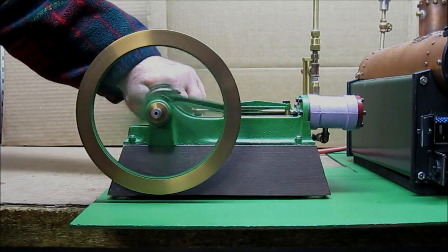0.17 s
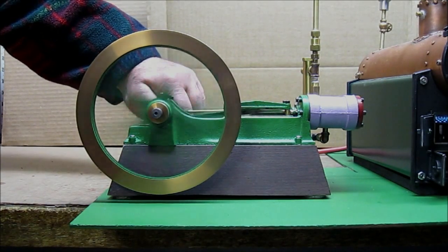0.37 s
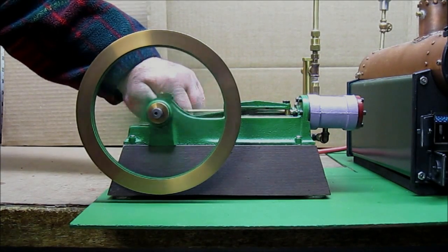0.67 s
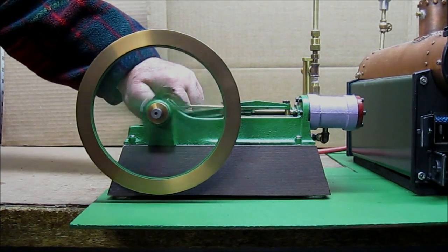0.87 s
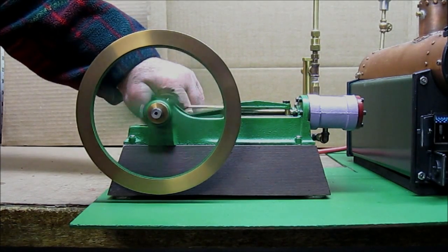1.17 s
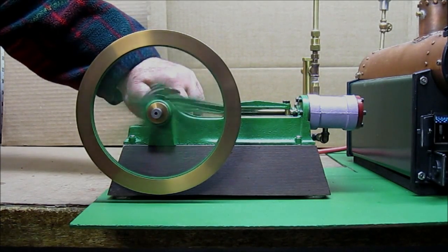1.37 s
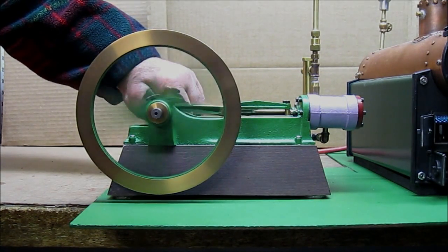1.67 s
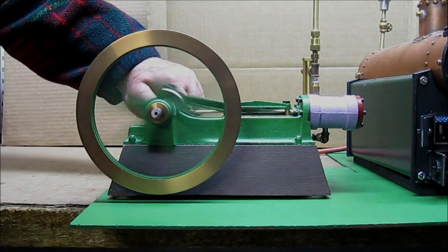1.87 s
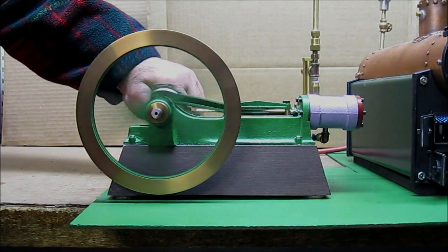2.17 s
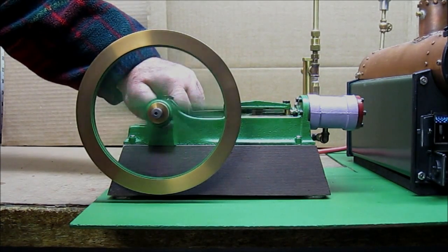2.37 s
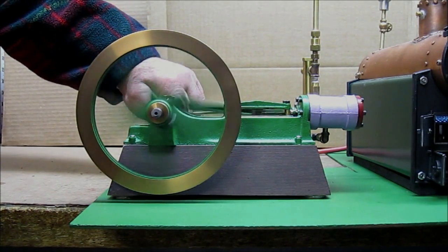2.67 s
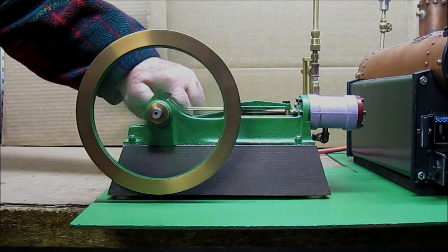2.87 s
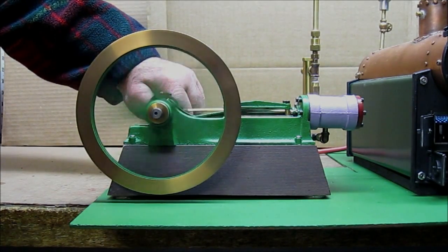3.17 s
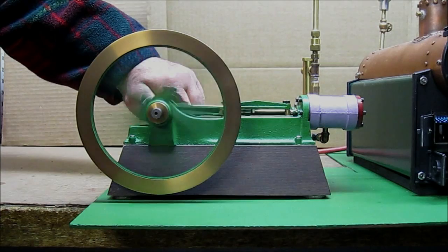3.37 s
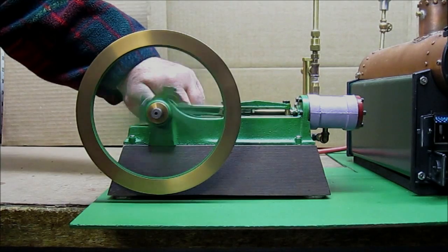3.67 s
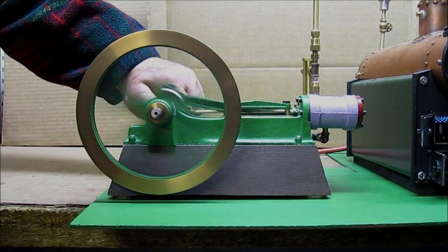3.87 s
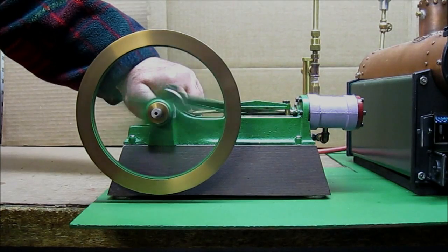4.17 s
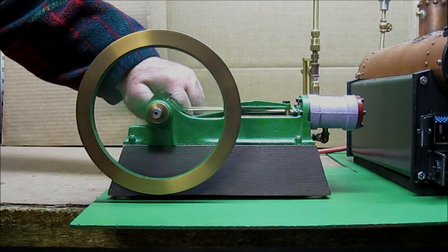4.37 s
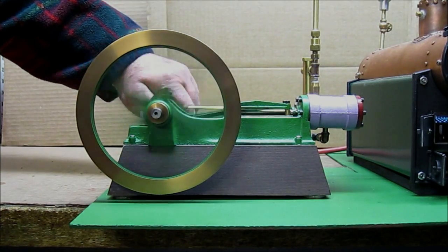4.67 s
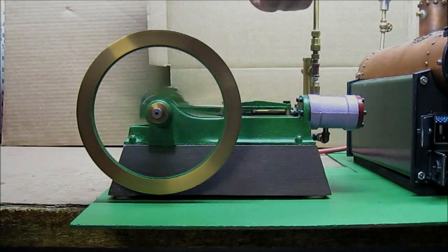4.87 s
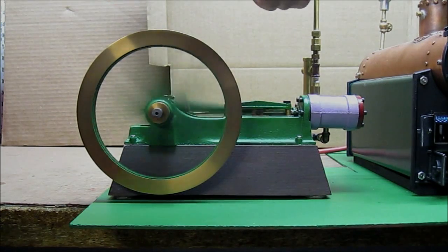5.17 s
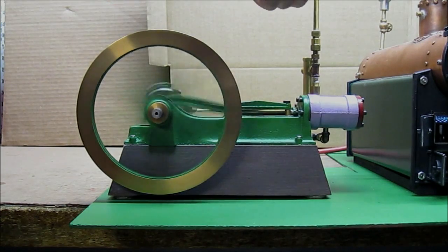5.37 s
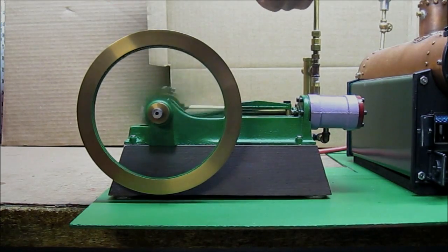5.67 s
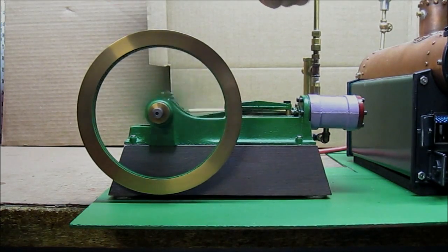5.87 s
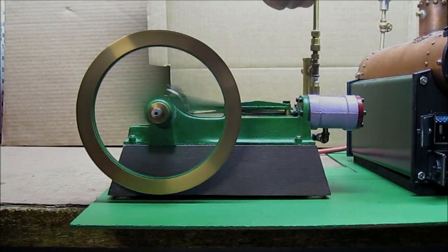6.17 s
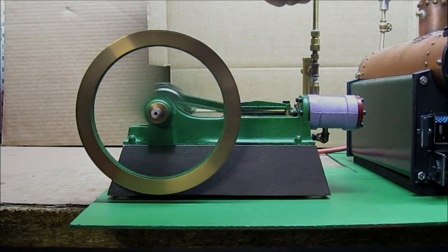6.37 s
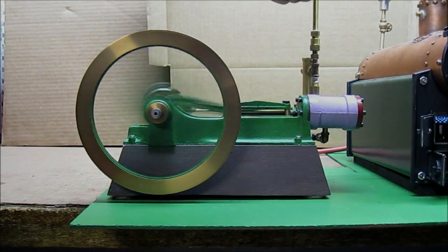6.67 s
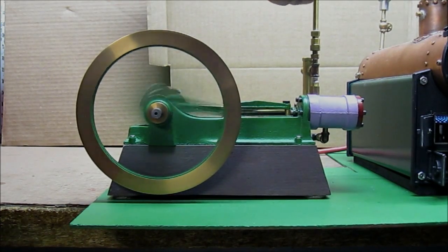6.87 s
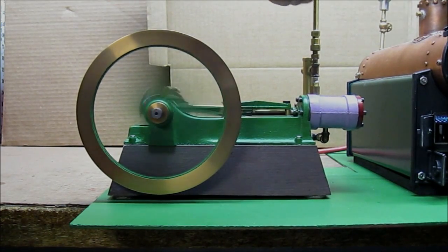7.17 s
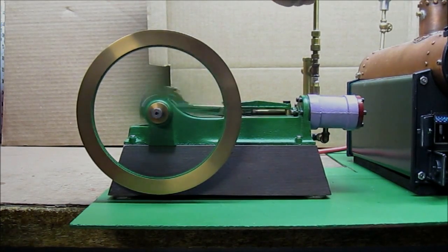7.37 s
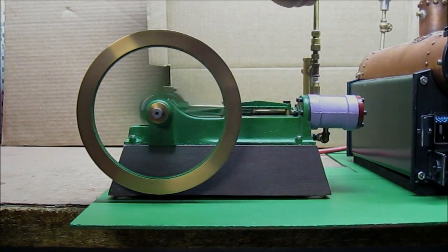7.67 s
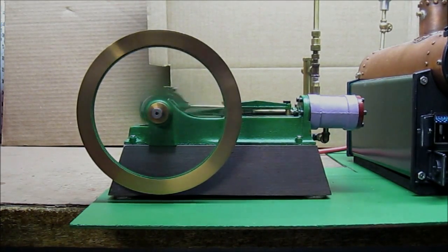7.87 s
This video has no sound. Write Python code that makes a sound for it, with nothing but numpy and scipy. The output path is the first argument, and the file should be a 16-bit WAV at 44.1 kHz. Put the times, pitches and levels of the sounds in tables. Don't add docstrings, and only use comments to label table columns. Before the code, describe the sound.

Fast hard metallic clacking of a toy steam engine, held back by hand for five seconds, then speeding up with sputtering steam and ringing metal.

```python
import sys
import numpy as np
from scipy import signal
from scipy.fft import rfft, irfft, next_fast_len
from scipy.io import wavfile
from scipy.ndimage import map_coordinates

SR = 44100
rng = np.random.default_rng(int(sys.argv[2]) if len(sys.argv) > 2 else 0)


def attenuation_scalar(level_db):
    decades = np.asarray(level_db, float) / 20
    return 10 ** decades


def persist_wave(psi):
    counts = np.round(np.clip(psi, -1, 1) * 32767).astype(np.int16)
    wavfile.write(sys.argv[1], SR, np.atleast_2d(counts).T)


N = 353241
RELEASED, FULL_SPEED = 4.92, 6.06

# time in seconds, speed in turns a second.
BRAKED_SPEED = [
    (-.1, 6.283),
    (0, 6.283),
    (.3, 6.948),
    (1.15, 6.393),
    (2.25, 6.366),
    (2.9, 6.446),
    (4.05, 6.753),
    (4.65, 6.861),
    (4.92, 7.585),
]
# time in seconds, speed in turns a second.
FREE_SPEED = [
    (4.92, 8.03),
    (5.62, 8.836),
    (6.57, 9.626),
    (8.02, 9.986),
]
PACES = 6.9, 7.6, 8.3, 9.3, 9.75
# frequency in Hz, level in dB per Hz.
RATTLE = [(180, -34), (300, -17), (900, -4.5), (1190, 1.5), (1700, -5), (2140, -3.5), (3400, -18),
          (16000, -64)]


def along(points, hz):
    f, db = np.transpose(points)
    return np.interp(np.log(hz + 1), np.log(f + 1), db)


def filtered(x, response):
    size = next_fast_len(len(x) + SR // 2)
    spectrum = rfft(x, size) * response(np.fft.rfftfreq(size, 1 / SR))
    return irfft(spectrum, size)[:len(x)]


def noise(spectrum, size=N):
    x = filtered(rng.standard_normal(size), lambda hz: attenuation_scalar(along(spectrum, hz)))
    return x / np.std(x)


def resonant(modes, order=1, sign=-1):
    def response(f):
        total = 0
        for k, (centre, width, db) in enumerate(modes):
            damping = 1j * f * width
            total = total + sign ** k * attenuation_scalar(db) * (damping / (centre * centre - f * f + damping)) ** order
        return total
    return response


def train(s, db):
    at = np.round(np.asarray(s) * SR).astype(int)
    inside = (at >= 0) * (at < N)
    return np.bincount(np.clip(at, 0, N - 1), attenuation_scalar(db) * inside, N)


def swell(pulses, rise, t60):
    t = np.arange(SR // 4) / SR
    return signal.fftconvolve(pulses, (1 - np.exp(-t / rise)) * attenuation_scalar(-60 * t / t60))[:N]


def wander(size, rate):
    return map_coordinates(rng.standard_normal(size), [np.arange(N) * rate / SR])


def paced(s, values):
    speed = np.interp(s, *np.transpose(BRAKED_SPEED + FREE_SPEED))
    return np.interp(speed, PACES, values)


def knocks(angle, delay_ms, scatter_db, *db):
    start_turns = -.953, 32.8842
    slack = 1, 1, 2, 1.6, 1.4
    luck = rng.standard_normal(70)
    rows = []
    for run, start in zip((BRAKED_SPEED, FREE_SPEED), start_turns):
        t = np.arange(run[0][0], run[-1][0], 1 / SR)
        turns = start + np.cumsum(np.interp(t, *np.transpose(run))) / SR
        turn = np.arange(np.ceil(turns[0] - angle), turns[-1] - angle)
        rows.append([np.interp(turn + angle, turns, t) + delay_ms / 1000, turn])
    s, turn = np.hstack(rows)
    scatter = scatter_db * paced(s, slack) * luck[turn.astype(int)]
    return s, paced(s, db) + scatter, turn


def burner():
    # frequency in Hz, level in dB per Hz.
    flame = [(70, -34), (229, -5.5), (650, 5.5), (850, -10.5), (2100, -12.5), (3000, -13), (6020, -19),
             (16000, -40.5)]
    flame_db = -51, -50, -50, -47.5, -46
    flutter_db = wander(200, rate=12)
    return attenuation_scalar(paced(np.arange(N) / SR, flame_db) + 9 + flutter_db) * noise(flame)


def flue():
    # frequency in Hz, level in dB.
    tones = [
        (475.2, -52.5),
        (514.5, -47),
    ]
    t = np.arange(N) / SR
    sound = np.zeros(N)
    for hz, db in tones:
        loudness = attenuation_scalar(db + 3 + 2.5 * wander(100, rate=5.5))
        sound += loudness * np.sin(2 * np.pi * hz * t + .7 * wander(100, rate=4.5))
    return sound


def bench(hit):
    # frequency in Hz, width in Hz, level in dB.
    bench_modes = [(57.5, 19.6, -4), (90, 44, -4), (154.4, 18.7, -1.5), (238, 23.6, 1.5)]
    drone_db = -45.5, -49, -43.5, -42.5, -43.5
    t = np.arange(N) / SR
    head_s, head_db, _ = hit['head']
    crank_s, crank_db, _ = hit['crank']
    jolts = train(head_s, head_db) - attenuation_scalar(8.5) * train(crank_s, crank_db)
    force = rng.standard_normal(N) + attenuation_scalar(-3.5) * jolts / np.std(jolts)
    drone = filtered(force, resonant(bench_modes))
    drone = filtered(drone, lambda hz: 1j * hz / (1j * hz + 6.3))
    sway_db = -59 + 17 * np.exp(-((paced(t, PACES) - 9) / .28) ** 2)
    sway = filtered(rng.standard_normal(N), lambda hz: np.exp(-((hz - 26) / 9) ** 2))
    drone *= attenuation_scalar(paced(t, drone_db) + 1.5) / np.std(drone)
    return drone + attenuation_scalar(sway_db - 7) * sway / np.std(sway)


def frame(column):
    # frequency in Hz, time to die by 60 dB in seconds, dB from the head, dB
    ringing_modes = [(491, 0.99, 3, 5), (743, 0.073, -5.5, 3.5), (792.7, 0.077, -1, 5), (865, 0.12, -8.5, -4),
                     (1016, 0.13, -16.5, 2), (1075, 0.068, -11.5, -5.5), (1111, 0.071, -0.5, -5),
                     (1194, 0.11, -33, -32), (1298.4, 0.064, -3.5, 10), (1450, 0.13, -15, -18),
                     (1550, 0.04, 0.5, 8), (1810, 0.2, 4, -19), (1813, 0.54, -4, 2),
                     (1960, 0.44, -8, -29), (1960, 0.4, 6.5, -18), (2120, 0.073, 9, -7),
                   (2201, 0.097, 15.5, 0), (2378, 0.062, 16, -11), (2490, 0.061, -20, 6),
                   (2762, 0.075, 11, -6), (2940, 0.034, 7.5, -1), (3195, 0.054, 5.5, -19),
                   (3504, 0.025, 3.5, -34), (3960, 0.016, 11, -6)]
    modes = []
    for mode in ringing_modes:
        width = np.log(1000) / np.pi / mode[1]
        modes.append((mode[0], width, mode[column]))
    return resonant(modes, sign=0.98)


def exhaust(hit):
    # frequency in Hz, level in dB per Hz.
    steam_colour = [(180, -25), (300, -20), (701, -2), (2210, -6.5), (4520, -15.5), (7690, -22),
                    (14500, -50), (16000, -77)]
    puff_db = -27.5, -27.5, -29.5, -25.5, -25.5
    opens = hit['valve'][0]
    returns = np.maximum(hit['crank'][0], 0)
    puff = swell(train(opens, paced(opens, puff_db)), rise=0.029, t60=0.18)
    back = swell(train(returns, paced(returns, puff_db) - 4), rise=0.027, t60=0.25)
    sputter = attenuation_scalar(3.9 * wander(2100, rate=250))
    steam = sputter * (attenuation_scalar(6.5) * puff * noise(steam_colour) + attenuation_scalar(4.5) * back * noise(RATTLE))
    return steam + attenuation_scalar(0.5) * filtered(steam, frame(column=2))


def clicks(hit):
    # frequency in Hz, level in dB per Hz.
    metal = [(2000, -6.5), (3400, 2.5), (4430, -7.5), (6460, -7), (8000, -14), (9050, -15.5),
             (13000, -24.5), (16000, -42)]
    # frequency in Hz, width in Hz, level in dB.
    pipe = [(4260, 520, -9), (4840, 250, -1), (5940, 290, 4.5), (7300, 320, -44), (8850, 1600, -6.5),
            (10400, 900, -4)]
    crack_db = -26, -31.5, -23.5, -17, -17
    s = hit['head'][0]
    db = paced(s, crack_db) + rng.standard_normal(len(s))
    cracks = train(s - .0028, db)
    head = swell(cracks, rise=0.00037, t60=0.024)
    s, db, _ = hit['crank']
    crank = swell(train(s - .002, db - 37.5), rise=0.00036, t60=0.0064)
    s, db, _ = hit['valve']
    valve = swell(train(s - .001, db - 19), rise=0.00035, t60=0.012)
    ringing = filtered(noise(metal), resonant(pipe))
    tail = attenuation_scalar(-18.5) * swell(cracks, rise=0.00095, t60=0.26) * ringing / np.std(ringing)
    return attenuation_scalar(3) * (head + crank + valve) * noise(metal) + tail


def blows(s, db, lag_ms, rebound_db):
    late, hard = rng.standard_normal((len(s), 2)).T
    again = s + lag_ms * (1 + .025 * late) / 1000
    return train(s, db) + train(again, db + rebound_db + 1.5 * hard)


def strike(pulses, thud, column, contact_ms, spread_ms, ring_db, room_db, room_t60):
    def even(x):
        return x / np.linalg.norm(x[:SR // 80])

    t = np.arange(SR // 3) / SR
    push = np.sin(np.pi * np.clip(1000 * t / contact_ms, 0, 1)) ** 2
    push = filtered(push, lambda hz: np.exp(-4j * np.pi * spread_ms * np.sqrt(hz / 1000)))
    body = filtered(push, resonant(thud, order=2))
    tail = noise(RATTLE, size=len(t)) * (1 - np.exp(-t / 0.00077)) * attenuation_scalar(-60 * t / room_t60)
    sound = even(body + attenuation_scalar(ring_db) * filtered(body, frame(column))) + attenuation_scalar(room_db) * even(tail)
    travel = round(spread_ms * SR / 1200)
    fresh = attenuation_scalar(room_db + 3) * swell(pulses, 0.0035, room_t60) * noise(RATTLE) / np.sqrt(SR // 80)
    return signal.fftconvolve(pulses, sound)[travel:N + travel] + fresh


def valve_gear(hit):
    # frequency in Hz, width in Hz, level in dB.
    tick_thud = [(890, 690, -6), (1260, 440, 7), (1800, 117, 9.5), (2560, 420, -11.5), (3730, 1000, 0.5)]
    s, db, _ = np.hstack([hit['late'], hit['valve']])
    ticks = blows(s - .0011, db, lag_ms=1.214, rebound_db=-7.5)
    return attenuation_scalar(15) * strike(ticks, tick_thud, column=2, contact_ms=.4, spread_ms=.9,
                            ring_db=4.5, room_db=-2, room_t60=0.12)


def rebound(s, column):
    # head lag in ms, head level in dB, crank lag in ms, crank level in dB.
    rebounds = [
        (3.621, -9, 3.43, -10),
        (3.384, -7.5, 2.98, -15),
        (2.063, -5, 2.515, -13.5),
    ]
    return np.transpose(rebounds)[column][np.searchsorted([RELEASED, FULL_SPEED], s)]


def rod(hit):
    # frequency in Hz, width in Hz, level in dB.
    braked_head = [(226, 110, -11.5), (776, 140, -26), (1060, 53, -19), (1423, 1150, 6), (1830, 956, 2.5),
                   (2200, 410, -42), (2723, 130, -8.5), (3410, 420, -1)]
    loose_head = [(224, 100, -12.5), (762, 140, 2), (1037, 85, 2.5), (1250, 440, 5), (2070, 1600, -5),
                  (2730, 770, -18), (3700, 400, -23)]
    racing_head = [(190, 75, -6), (720, 114, 0.5), (1405, 350, 3), (1890, 490, -1), (2870, 340, -8),
                   (3940, 290, -33)]
    braked_crank = [(220, 440, -14), (833, 440, -4), (1060, 230, 3), (1237, 190, 3), (1725, 330, -2.5),
                    (2200, 120, 0), (2480, 450, -1), (2940, 180, -16)]
    free_crank = [(191, 100, -23), (842, 360, -4.5), (1216, 260, 7.5), (1838, 250, 7), (2240, 120, 4.5),
                  (2980, 290, -4.5), (3920, 340, -5)]
    # time in seconds, dB added on even turns and
    pin_swing = [
        (0, -2),
        (.6, -2),
        (.95, 2.8),
        (3.0, 3.2),
        (3.4, -0.5),
        (4.1, 1.2),
        (4.45, 4),
        (4.8, -2.5),
    ]
    t = np.arange(N) / SR
    braked, racing = t < RELEASED, t > FULL_SPEED
    loose = ~(braked | racing)

    s, db, _ = hit['head']
    head = blows(s - .0013, db, rebound(s, column=0), rebound(s, column=1))
    head += train(s - .0028, db - 14)
    s, db, turn = np.compress(hit['pin'][0] < RELEASED, hit['pin'], axis=1)
    db = db + (-1) ** turn * np.interp(s, *np.transpose(pin_swing))
    head += train(s - .0012, db - 9)
    s, db, _ = hit['crank']
    crank = blows(s - .0019, db, rebound(s, column=2), rebound(s, column=3))
    crank += train(s - .003, db - 4.5)

    sound = attenuation_scalar(19.5) * strike(head * braked, braked_head, column=2, contact_ms=0.38, spread_ms=.8,
                               ring_db=4.5, room_db=-15.5, room_t60=0.17)
    sound += attenuation_scalar(20.5) * strike(head * loose, loose_head, column=2, contact_ms=0.34, spread_ms=1.18,
                                ring_db=-1, room_db=-16.5, room_t60=0.27)
    sound += attenuation_scalar(20.5) * strike(head * racing, racing_head, column=2, contact_ms=0.31, spread_ms=.8,
                                ring_db=2.5, room_db=-15.5, room_t60=0.16)
    sound += attenuation_scalar(16.5) * strike(crank * braked, braked_crank, column=3, contact_ms=0.49, spread_ms=1.674,
                                ring_db=7.5, room_db=-5.5, room_t60=0.05)
    sound += attenuation_scalar(18.5) * strike(crank * ~braked, free_crank, column=3, contact_ms=0.27, spread_ms=2.47,
                                ring_db=13, room_db=-9.5, room_t60=0.098)
    return sound


def nook(x):
    # frequency in Hz, width in Hz, level in dB.
    nulls = [(690, 60, -5), (970, 60, -5), (1165, 55, -13), (2085, 60, -7), (2400, 120, -10)]

    def response(f):
        total = 1
        for centre, width, db in nulls:
            stiffness, damping = centre * centre - f * f, 1j * f * width
            total = total * (stiffness + damping * attenuation_scalar(db)) / (stiffness + damping)
        return total
    return filtered(x, response)


def scene():
    # crank angle in turns, delay in ms, scatter in dB.
    knock_angles = dict(head=(0, 0, .5), crank=(.396, 3.6, .7), pin=(0, 27.4, 1), late=(-.268, 4.5, 1.4),
                    valve=(-.143, 4.5, 1.5))
    force_db = dict(head=(-4, -4.5, -5, -6, -5), crank=(-7, -7, -7, -5.5, -4), pin=(-4.5, -4, -3, -7, -7),
                late=(-20.7, -22, -17, -17.5, -15), valve=(-17.5, -16, -17.5, -21.5, -23))
    hit = {name: knocks(*row, *force_db[name]) for name, row in knock_angles.items()}
    background = burner() + flue() + bench(hit)
    engine = exhaust(hit) + clicks(hit) + valve_gear(hit) + rod(hit)
    return (background + nook(engine))[None]


def band_limit(x):
    return signal.sosfilt(signal.butter(12, 16440, fs=SR, output="sos"), x)


def record(dry):
    clipped = np.clip(dry[0], -1, 1)
    mix = filtered(clipped, lambda hz: 1 / (1 + (hz / 15700) ** 40))
    return band_limit(mix[None])


dry = scene()
out = record(dry)
persist_wave(out)
```